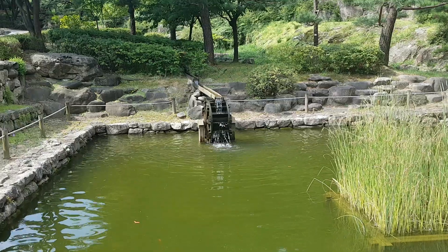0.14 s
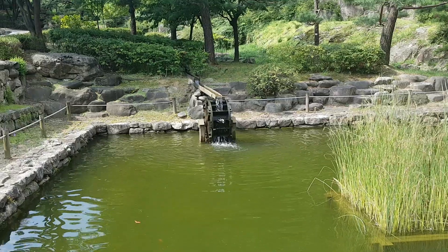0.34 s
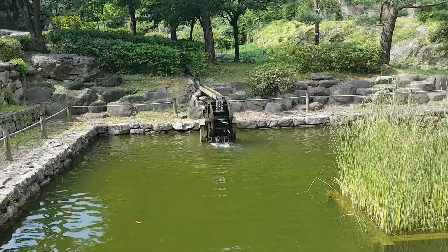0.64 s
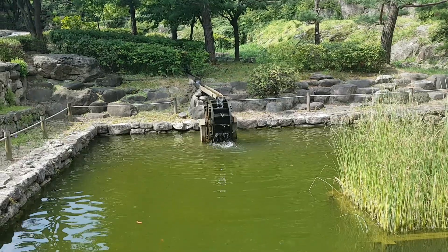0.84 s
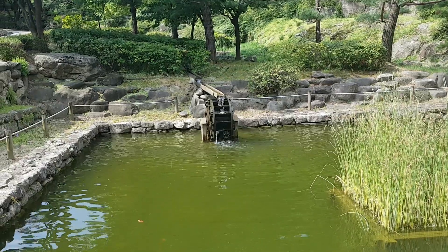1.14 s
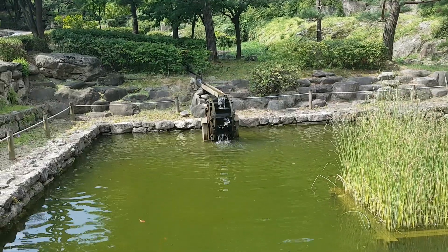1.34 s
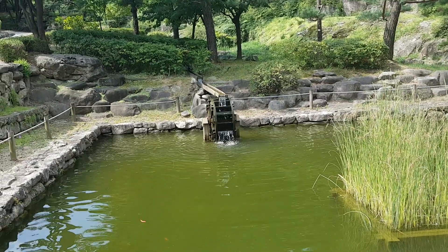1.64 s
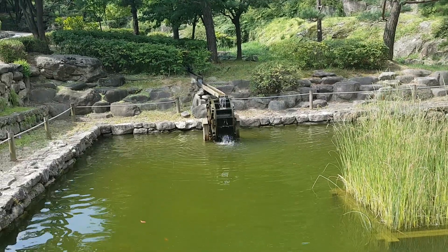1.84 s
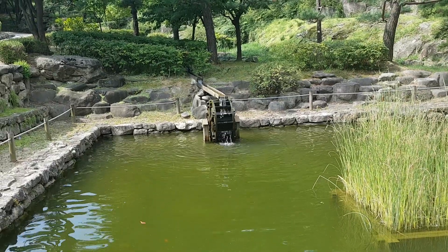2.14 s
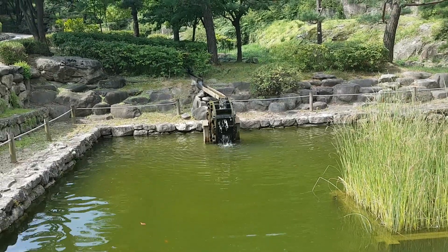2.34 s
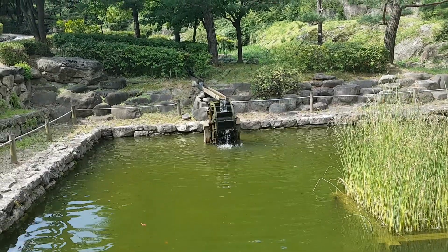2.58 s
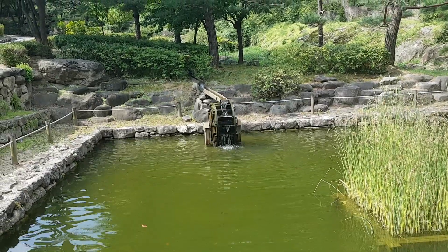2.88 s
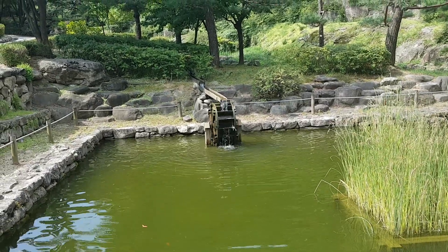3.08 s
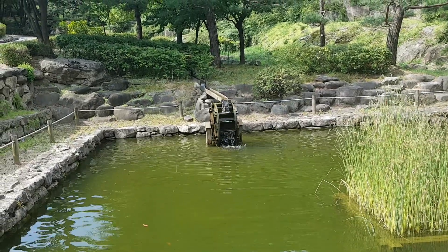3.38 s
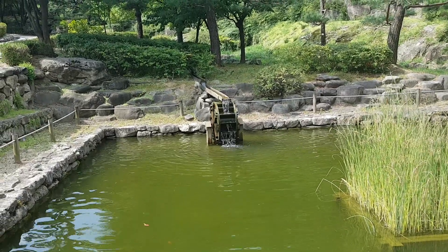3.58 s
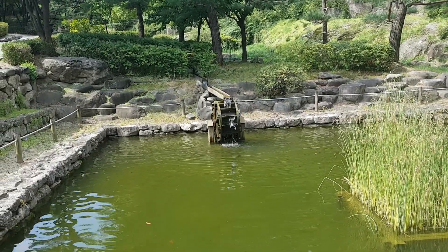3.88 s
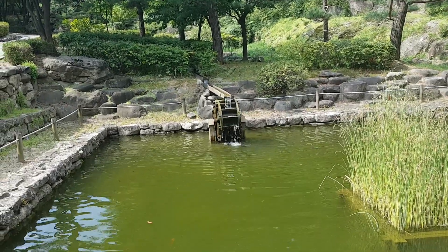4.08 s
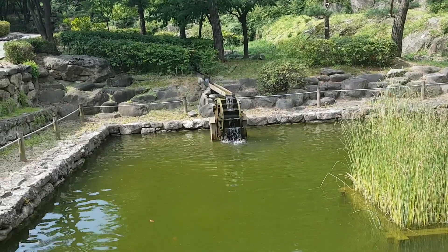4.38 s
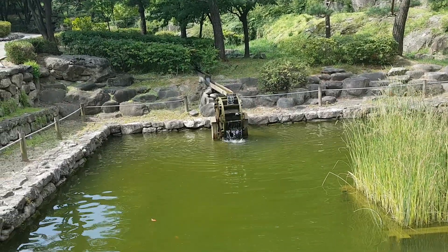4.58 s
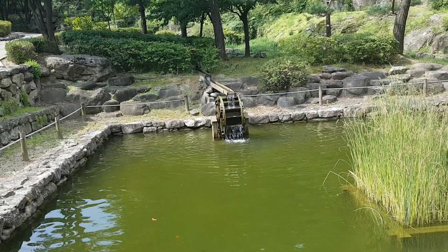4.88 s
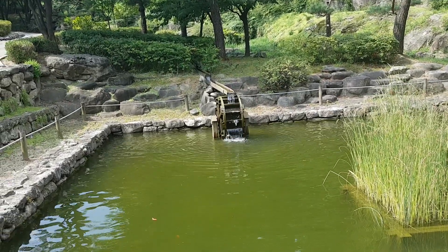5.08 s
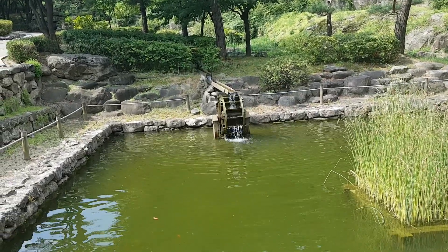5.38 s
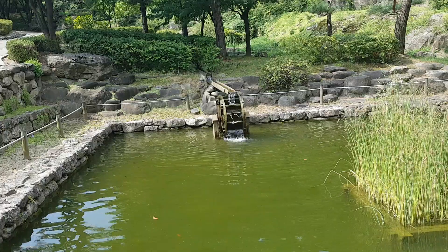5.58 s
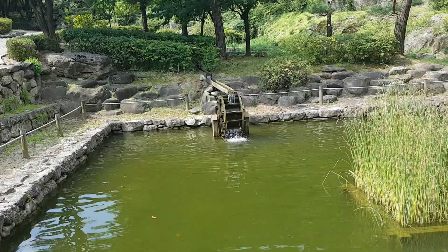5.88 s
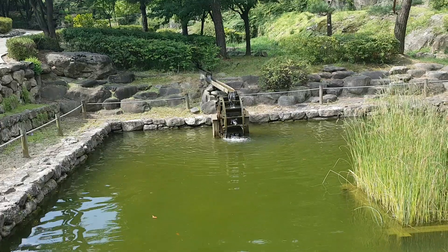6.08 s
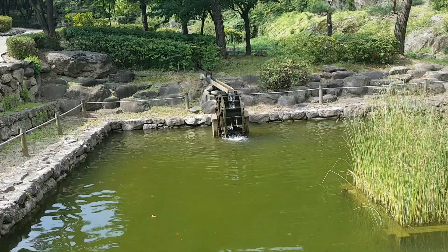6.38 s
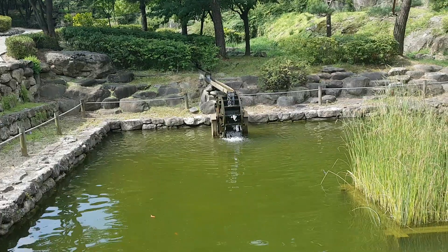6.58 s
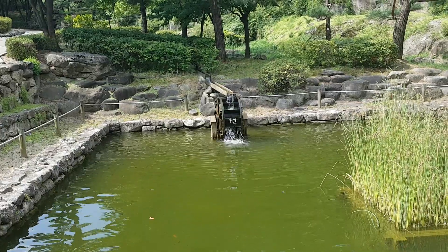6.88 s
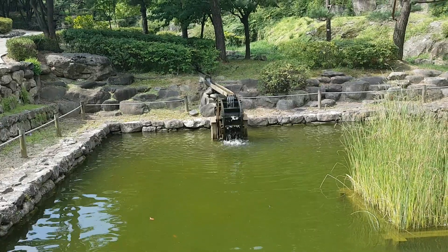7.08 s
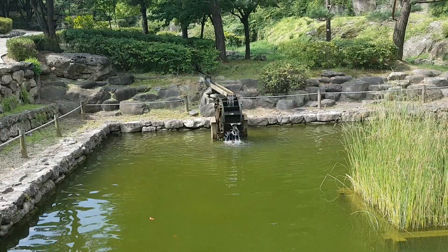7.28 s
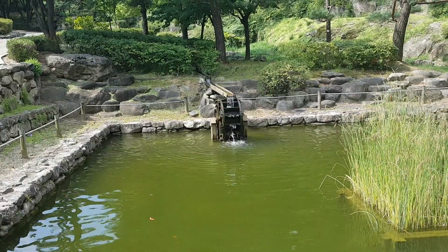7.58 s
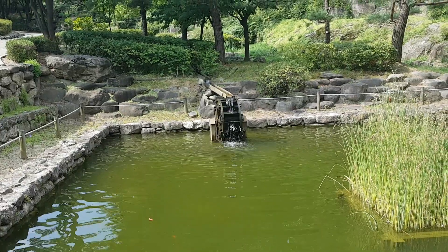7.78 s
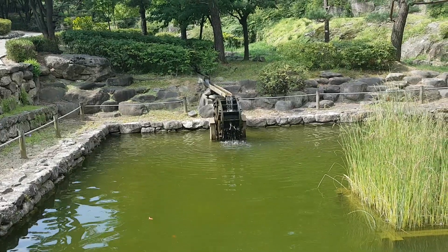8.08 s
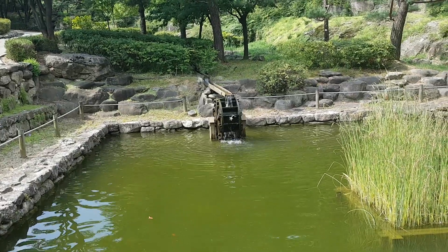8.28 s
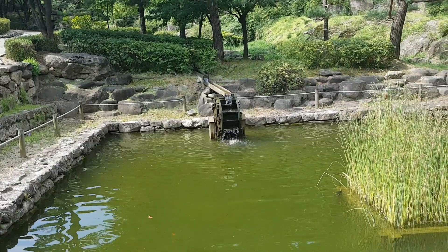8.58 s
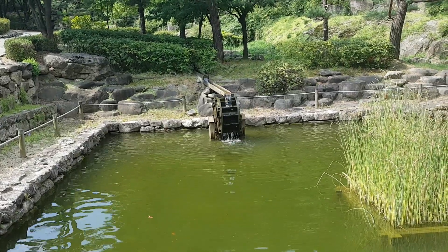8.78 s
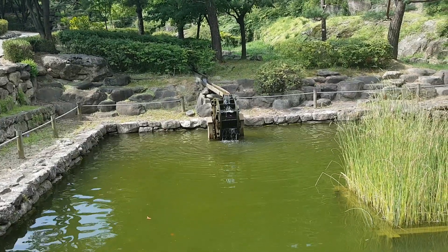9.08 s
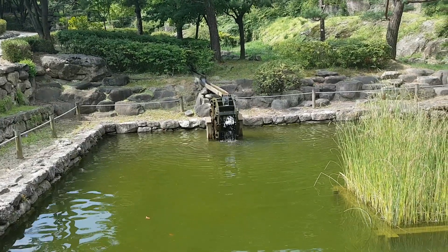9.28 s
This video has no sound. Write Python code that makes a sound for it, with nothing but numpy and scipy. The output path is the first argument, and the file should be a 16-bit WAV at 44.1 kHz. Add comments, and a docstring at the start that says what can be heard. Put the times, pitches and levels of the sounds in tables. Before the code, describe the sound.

A loud cicada chorus swells and buzzes over a garden pond while soft hollow footsteps thud nearby and a small waterwheel trickles and plops.

```python
"""Cicada chorus by a pond waterwheel

A chorus of cicadas swells in the trees around a garden pond: ribbed tymbals buckle in quick volleys of clicks.
Soft steps ring the modes of a hollow deck close to the stereo microphone.
Across the pond a small waterwheel spills water: many ringing bubbles, a noisy wash and single splashes.
Far traffic is low noise, with a roar hollowed by a delayed reflection."""
import sys
import numpy as np
from scipy import signal
from scipy.fft import rfft, irfft
from scipy.io import wavfile
from scipy.ndimage import uniform_filter1d

SR = 44100
rng = np.random.default_rng(int(sys.argv[2]) if len(sys.argv) > 2 else 0)


def transcribe(signal):
    """Save signal, clipped to [-1, 1], as a 16-bit WAV file at the path in sys.argv[1]."""
    frames = np.atleast_2d(signal).T
    limited = np.clip(frames, -1, 1)
    pcm = np.round(limited * 32767).astype(np.int16)
    wavfile.write(sys.argv[1], SR, pcm)


N = 416304
TIME = np.arange(N) / SR


def undb(db):
    """Decibels to gain."""
    return 10 ** (np.asarray(db) / 20)


def unit(x):
    """Scale to rms 1."""
    return x / np.sqrt(np.mean(x ** 2))


def rise(mid_s, width_s):
    """An S-curve in time from 0 to 1, halfway at mid_s."""
    return 1 / (1 + np.exp((mid_s - TIME) / width_s))


def walk(rate):
    """Slow chance with a spread near 1: random steps, rate per second, smoothed twice."""
    k = max(int(SR / rate), 1)
    held = np.repeat(rng.standard_normal(N // k + 1), k)
    smooth = uniform_filter1d(uniform_filter1d(held, k), k)
    return np.sqrt(2) * smooth[:N]


def add(track, s, sound):
    """Mix a sound into a track at time s."""
    i = int(np.clip(s * SR, 0, N - 1))
    track[i:i + len(sound)] += sound[:N - i]


def colour(x, points):
    """Filter by a spectrum of (Hz, dB) points, joined by lines over log frequency."""
    hz, db = np.transpose(points)
    f = np.maximum(np.fft.rfftfreq(N, 1 / SR), 1)
    gain = undb(np.interp(np.log(f), np.log(hz), db))
    return irfft(rfft(x) * gain, N)


def pan(db):
    """Gains for left and right that differ by db, left louder when positive."""
    return undb([[db / 2], [-db / 2]])


def scatter(x, t60):
    """Trees and rocks return a diffuse tail, different at each ear."""
    t = np.arange(int(t60 * SR)) / SR
    tail = rng.standard_normal((2, len(t))) * np.exp(-np.log(1000) * t / t60)
    tail /= np.sqrt(np.sum(tail ** 2, axis=1, keepdims=True))
    return signal.oaconvolve(x[None], tail, axes=1)[:, :N]


def air(points, apart_hz):
    """Stereo noise of a given colour, alike at both ears below apart_hz."""
    mid, side = rng.standard_normal((2, N))
    side = signal.sosfilt(signal.butter(1, apart_hz, "high", fs=SR, output="sos"), side)
    return unit(colour(np.array([mid + side, mid - side]), points))


def tymbal(volley_hz, jitter_s, drift=.008, fade_db=1.4, uneven_db=0.7, count=6):
    """One cicada: each muscle pull buckles a row of ribs, one click each, weaker towards the end."""
    volleys = int(np.ceil(N / SR * 60))  # enough for 60 per second
    chance = rng.standard_normal((volleys, 2 * count + 1))
    rate = volley_hz * (1 + drift * unit(uniform_filter1d(chance[:, 0], 20)))
    rib = np.arange(count)
    spacing = (rib + rng.uniform(-.3, .3, count)) / count  # every insect has its own ribs
    pull_s = np.cumsum(1 / rate) - (1 + rng.random()) / volley_hz
    click_s = pull_s[:, None] + spacing / volley_hz
    click_s = click_s + jitter_s * chance[:, 1:count + 1]
    size = undb(uneven_db * chance[:, count + 1:] - fade_db * rib)
    heard = (click_s >= 0) & (click_s * SR < N)
    return unit(np.bincount((click_s[heard] * SR).astype(int), size[heard], N))


def rasp(clicks, t60):
    """Each click dies away in the insect's hollow body and the stirring leaves, never twice alike."""
    t = np.arange(int(t60 * SR) + 1) / SR
    energy = signal.oaconvolve(clicks ** 2, np.exp(-2 * np.log(1000) * t / t60))[:N]
    return unit(np.sqrt(np.abs(energy)) * rng.standard_normal(N))


# Full chorus level, how far below it the swell starts, and the middle and width of its S-curve
CHORUS_DB, SWELL_DB, SWELL_MID_S, SWELL_WIDTH_S = -26.5, 8.0, 1.9, 1
TINT_FADES_S = 2.3  # the early tint is half gone here
# Colour of the song. Each row: frequency in Hz, left gain in dB, right gain in dB.
SONG_COLOUR = [(2920, -19.5, -17.5), (3544, -7, -3), (4080, -12, -8), (4460, -5, -1), (5290, -10.5, -3),
               (6010, -9, 0.0), (6780, -11, -4.0), (7480, -15, -3.5), (8340, -18.5, -14), (9630, -11, -19),
               (11130, -16.5, -18), (12900, -18.5, -22.5), (13950, -32, -25), (15600, -34, -36)]
# The nearest insects. Each row: volleys per second, time of joining in seconds,
# level in dB relative to the far chorus, left minus right in dB, left ear lag in ms.
NEAR_SINGERS = [(46.88, -15, -6.0, -2, 0.2), (49, 3.5, -5, 2.0, 0.16), (47.8, 5.5, -8.5, 2.5, 0.16),
                (48.56, 0, -8, 3.5, 0.18), (42.76, -5, -8.5, -9, -0.091)]
# Tint that makes the early song evener. Each row: frequency in Hz, gain in dB.
EARLY_TINT = [(3500, 0), (4050, 2), (4500, -0.5), (5200, 1.5), (8000, -2.5), (9500, -4.5), (11500, -3.5),
              (14000, 0)]


def cicadas(join_s=0.38, rib_t60=0.018, near_wet_db=-4.5, near_t60=.1, far_t60=0.028, rock_t60=.25,
            rock_db=-3.0, waver_db=0.19, count=8):
    """Tymbal clicks rasp from a few near singers, over many far ones blurred on either side."""
    level_db = CHORUS_DB - SWELL_DB * (1 - rise(SWELL_MID_S, SWELL_WIDTH_S))
    crowds = [sum(tymbal(rng.uniform(43, 52), jitter_s=0.00028) for _ in range(count))
              for ear in range(2)]
    # the far crowds come blurred by foliage and echoed by the rocks
    leaves = np.array([rasp(crowd, far_t60) for crowd in crowds])
    all_clicks = sum(crowds)
    rocks = unit(scatter(unit(all_clicks - np.mean(all_clicks)), rock_t60))
    song, power = unit(leaves + undb(rock_db) * rocks), 1
    for volley_hz, joins, db, pan_db, lag_ms in NEAR_SINGERS:
        clicks = tymbal(volley_hz, jitter_s=.00018)
        buzz = rasp(clicks, rib_t60)
        left = np.roll(buzz, int(round(lag_ms * SR / 1000)))
        direct = np.array([left, buzz]) * pan(pan_db)
        effort = undb(db) * rise(joins, join_s)
        song = song + effort * unit(direct + undb(near_wet_db) * scatter(clicks, near_t60))
        power = power + effort ** 2
    # joining singers change the mix; the swell alone sets the level
    song = song / np.sqrt(power)
    song = signal.sosfilt(signal.butter(12, 2850, "high", fs=SR, output="sos"), song)
    song = np.array([colour(song[ear], np.array(SONG_COLOUR)[:, [0, ear + 1]]) for ear in range(2)])
    # the song's peaks sharpen as the chorus fills
    full = rise(TINT_FADES_S, SWELL_WIDTH_S)
    song = full * song + (1 - full) * colour(song, EARLY_TINT)
    return song / np.std(song.mean(0)) * undb(level_db + waver_db * walk(12))


# After each heel the sole settles: lag, level relative to the heel, hardness
SOLE_LAG_S, SOLE_DB, SOLE_HARD_DB = .046, -11.5, -11
# Heel strikes. Each row: start in seconds, then heel peak in dB, hardness in dB and
# scuff peak in dB, both peaks before the overall step gain.
HEELS = [(0.012, -27, -15, -31), (0.253, -23, -23, -38), (0.531, -29, -41, -33), (0.568, -25.5, -15, -30.5),
         (0.854, -15.5, -12.5, -30), (1.189, -26.5, -45, -30), (1.641, -25, -30, -33),
         (4.513, -31, -26, -43), (5.01, -25.5, -10, -42), (5.493, -32, -6, -31), (5.871, -29, -6, -30),
         (6.196, -16.5, -7, -31), (6.475, -28, 3, -31), (6.713, -31, -17, -31), (7.011, -32, -3, -36),
         (7.31, -40, 4, -39), (7.535, -24.5, -28, -30), (7.864, -20, -8, -28), (8.197, -27, -25, -36),
         (8.653, -21.5, -20, -34)]
# The deck's modes. Each row: frequency in Hz, gain in dB at usual hardness, decay t60 in seconds.
DECK_MODES = [(106.5, -21, 1.57), (122, -3, 0.044), (199.5, -0.5, 0.059), (239.7, -2.5, 0.054),
              (291, -12, 0.053), (457, -19.5, 0.034), (645, -16, 0.021)]


def steps(hard_tilt=0.6, contact_s=0.00481, step_db=0.5, scuff_s=0.047, wet_db=-20.0):
    """Heel, then sole push on the deck and scuff it; a harder step favours its higher modes."""
    out, t = np.zeros(N), np.arange(SR) / SR
    hz, mode_db, t60 = np.array(DECK_MODES).T[:, :, None]
    modes = np.cos(2 * np.pi * hz * (t - contact_s)) * np.exp(-np.log(1000) * t / t60)
    usual_db = np.mean(np.array(HEELS)[:, 2])
    octaves = np.log2(hz / DECK_MODES[2][0])  # the tilt pivots on the third mode
    fade = np.exp(-t / scuff_s)  # the sliding sole damps the boards

    def thud(hard_db):
        """The boards' answer to one push, peak 1."""
        gains = undb(mode_db + hard_tilt * (hard_db - usual_db) * octaves)
        onset = 1 - np.exp(-(t / contact_s) ** 2)
        ring = np.sum(gains * modes, axis=0) * onset
        return ring / np.abs(ring).max()

    for s, db, hard_db, scuff_db in HEELS:
        heel = thud(hard_db)
        scuff = signal.fftconvolve(heel * fade, rng.standard_normal(SR) * fade)[:SR]
        add(out, s, undb(db) * heel + undb(scuff_db) * scuff / np.abs(scuff).max())
        add(out, s + SOLE_LAG_S, undb(db + SOLE_DB) * thud(SOLE_HARD_DB))
    return undb(step_db) * (out + undb(wet_db) * scatter(out, .2))


def bubble(hz, cycles, glide=0.1):
    """A trapped air bubble rings and rises in pitch as it nears the surface."""
    u = np.linspace(0, 1, int(SR * cycles / hz) + 2)
    swell = 1 - np.exp(-cycles * u)  # it takes a cycle to pinch off
    tone = np.sin(2 * np.pi * cycles * (u + glide * u ** 2 / 2))
    return tone * swell * np.exp(-np.log(100) * u)


FLOW_DB = -48  # gain of the wheel's water, which runs almost evenly
# Colour of the wheel's wash. Each row: frequency in Hz, gain in dB.
WASH_COLOUR = [(200, -7), (400, 5), (650, 2), (1000, -3), (1400, 1), (2200, 3), (2800, 1.5), (5000, -28),
               (12000, -62)]


def waterwheel(spread_db=2.5, cycles=14, bubbles_db=-2.0, wash_db=0.0, slosh_hz=6, slosh_db=0.3,
               pan_db=-3.0, count=5000):
    """Water falls from the paddles: a crowd of bubbles over a sloshing wash."""
    bubbles = np.zeros(N)
    for when, pitch, size, ring in rng.random((count, 4)):
        hz = 450 * 2 ** (3.5 * pitch)
        gain = undb(-spread_db * np.log(1.01 - size)) * hz  # few are loud
        add(bubbles, when * N / SR, gain * bubble(hz, cycles * (.5 + ring)))
    bubbles = unit(colour(bubbles, WASH_COLOUR))
    bubbles = unit(bubbles + undb(3.0) * scatter(bubbles, .2))
    water = undb(bubbles_db) * bubbles + undb(wash_db) * air(WASH_COLOUR, apart_hz=930)
    return water * undb(FLOW_DB + slosh_db * walk(slosh_hz)) * pan(pan_db)


# The loudest splashes. Each row: start in seconds, level in dB, bubble pitch in Hz,
# spray in dB relative to that level.
LOUD_SPLASHES = [(1.119, -35, 470, -18), (2.314, -36, 960, -18), (3.016, -32, 1360, -14),
                 (4.151, -29, 2310, -16), (4.211, -30, 1250, -12), (4.508, -32, 2240, -19),
                 (4.53, -28, 1024, -14), (5.394, -33, 1023, -12.5), (6.585, -33, 2460, -18),
                 (6.846, -32, 2140, -9), (8.868, -31, 1360, -12), (8.914, -34, 2340, -11),
                 (8.949, -33, 545, -10)]


def splashes(cycles=30, spray_s=0.024, splash_db=0.0, wet_db=-7.5):
    """A full paddle slaps the pond: a short spray of noise and one big bubble."""
    plops, spray = np.zeros((2, N))
    t = np.arange(SR // 10) / SR
    for s, db, hz, spray_db in LOUD_SPLASHES:
        add(plops, s, undb(db) * bubble(hz, cycles, glide=0.068))
        add(spray, s, undb(db + spray_db) * np.exp(-t / spray_s))
    hiss = unit(colour(rng.standard_normal(N), [(300, -27), (600, 13), (2500, 8), (6000, -30)]))
    out = plops + spray * hiss
    return undb(splash_db) * (out + undb(wet_db) * scatter(out, .2))


# Levels of rumble and roar, delay of the roar's reflection and how fast it shortens
RUMBLE_DB, ROAR_DB, ECHO_MS, ECHO_SHORTENS_MS_PER_S = -44.5, -47, 2.605, 0.046
# The roar swells as something passes: when, for how long, by how much
PASS_S, PASS_WIDTH_S, PASS_DB = 6.26, 1.27, 3
# Colour of the distant rumble. Each row: frequency in Hz, gain in dB.
RUMBLE_COLOUR = [(15, -24), (27, -18), (41, -0.5), (62, -2), (85, -3.5), (106, -3.5), (135, -5), (220, -8),
                 (300, -14.5), (420, -22.5), (900, -47)]
# Colour of the traffic roar. Each row: frequency in Hz, gain in dB.
ROAR_COLOUR = [(120, -29), (220, 1.5), (450, 0.5), (650, 0), (1050, -2.5), (1500, -11.5), (2500, -35)]


def distance(reflection=0.5, waver_hz=1.14, waver_db=-0.34):
    """Far traffic: a low rumble, and a roar whose hollow colour slides up as its reflection arrives sooner."""
    delay_ms = ECHO_MS - ECHO_SHORTENS_MS_PER_S * TIME
    roar_db = ROAR_DB + PASS_DB * np.exp(-((TIME - PASS_S) / PASS_WIDTH_S) ** 2)
    roar = air(ROAR_COLOUR, apart_hz=910)
    echo = np.array([np.interp(TIME - delay_ms / 1000, TIME, ear) for ear in roar])
    hollow_roar = unit(roar - reflection * echo)
    rumble = air(RUMBLE_COLOUR, apart_hz=716) * undb(RUMBLE_DB + waver_db * walk(waver_hz))
    return rumble + undb(roar_db) * hollow_roar


def scene():
    """The garden, left and right."""
    return cicadas() + steps() + waterwheel() + splashes() + distance()


TOP_HZ = 15700


def record(dry):
    """The recorder cuts the treble steeply above TOP_HZ."""
    return colour(dry, [(TOP_HZ, 0), (TOP_HZ + 200, -80)])


dry = scene()
out = record(dry)
transcribe(out)
```